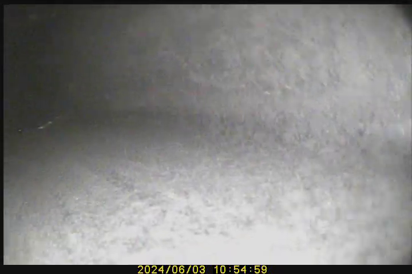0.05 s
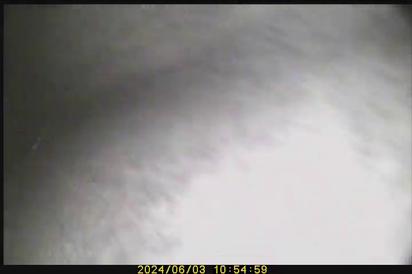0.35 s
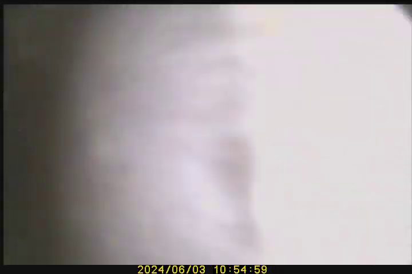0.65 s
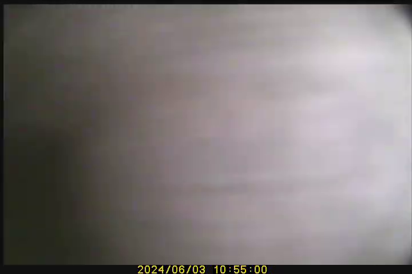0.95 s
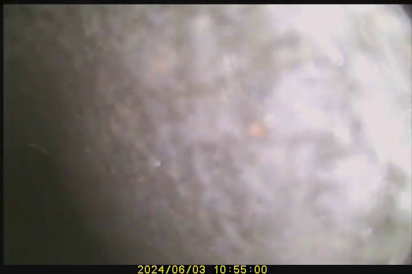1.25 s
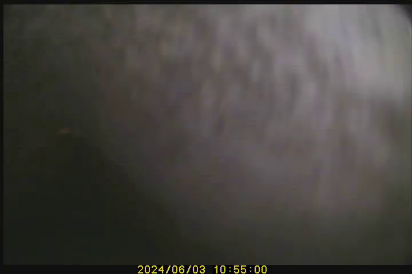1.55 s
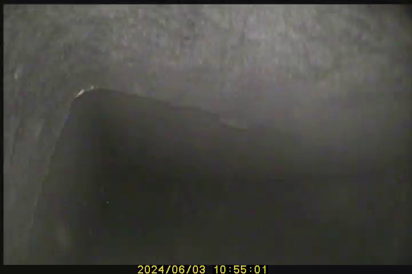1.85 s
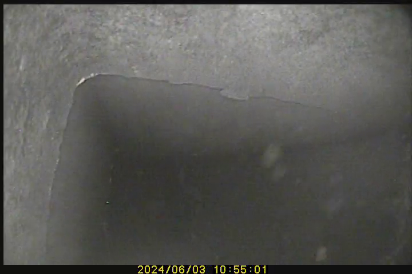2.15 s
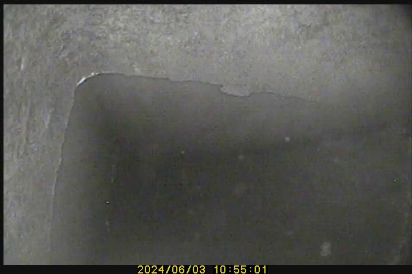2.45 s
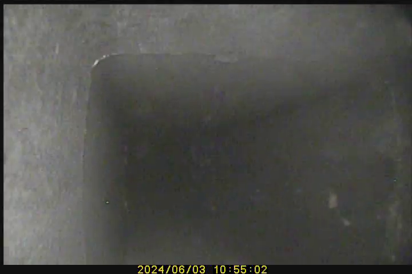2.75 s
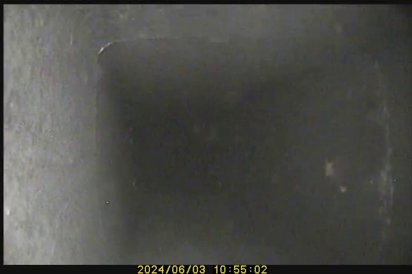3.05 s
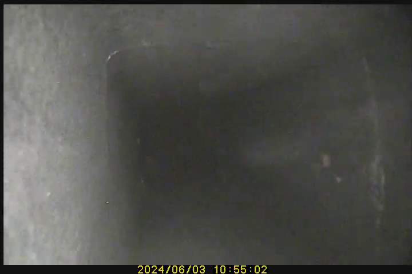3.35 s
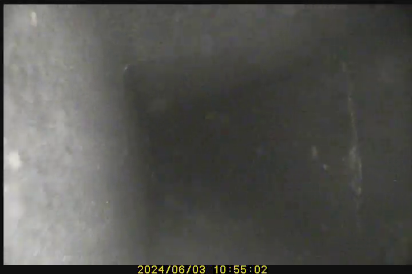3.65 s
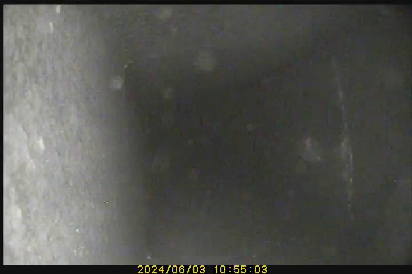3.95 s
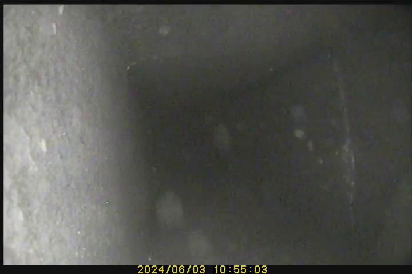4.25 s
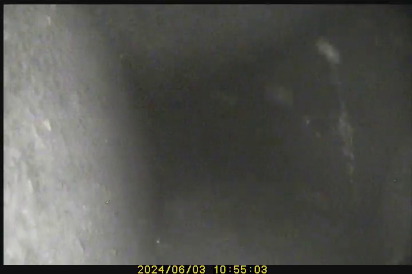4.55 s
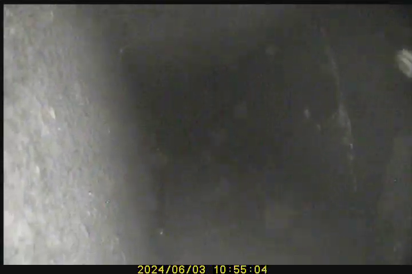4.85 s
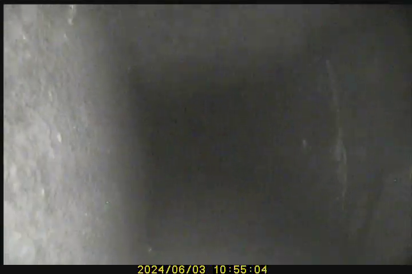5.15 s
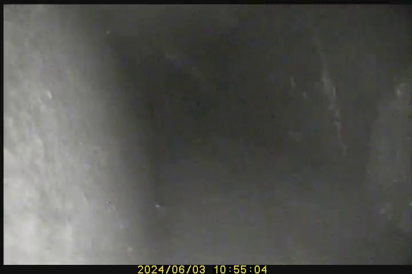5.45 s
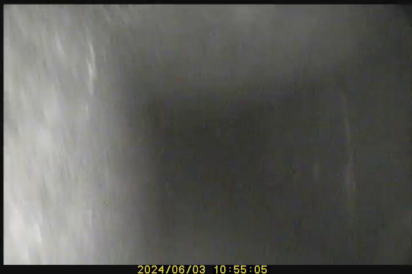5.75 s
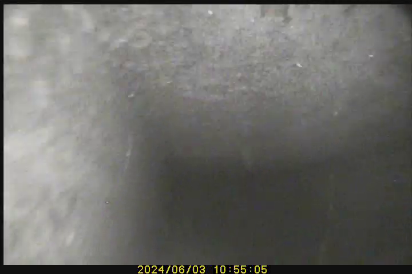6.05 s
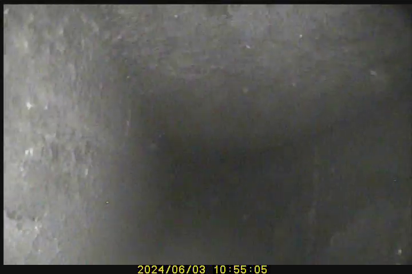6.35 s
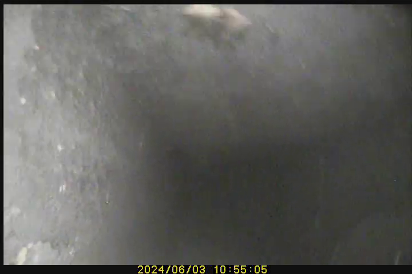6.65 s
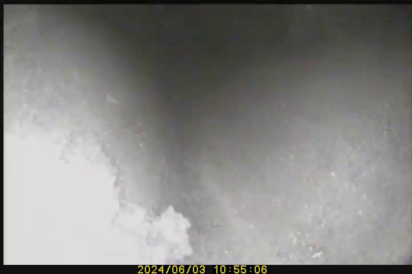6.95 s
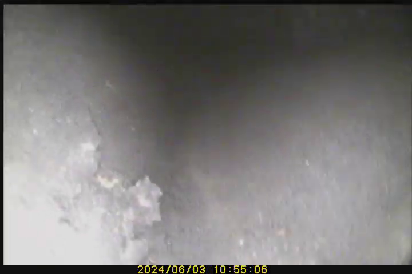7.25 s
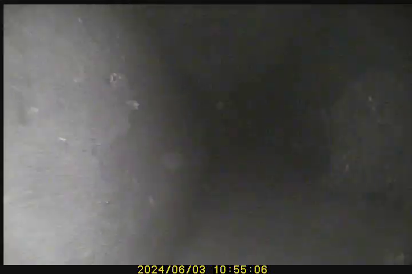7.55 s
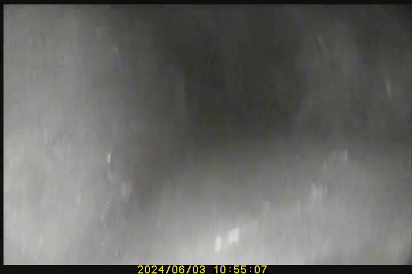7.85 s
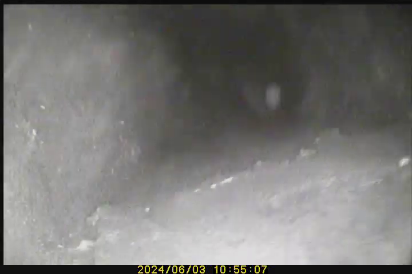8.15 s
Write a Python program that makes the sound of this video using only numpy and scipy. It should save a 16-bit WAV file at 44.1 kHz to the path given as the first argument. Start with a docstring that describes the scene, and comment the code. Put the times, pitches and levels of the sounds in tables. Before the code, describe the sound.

An inspection camera pushed along a chimney flue scrapes and hisses in uneven surges, with sharp knocks and brief metallic ringing.

```python
"""A faint hum and a sliding hiss come first: indoors, an inspection camera is pushed along a chimney flue. Its
rod hisses with each push, while its head grinds over soot, knocks on the walls and chafes on ridges. Hard rubs
stir a hollow note in the flue, and later the metal head rings as it drags along an edge and takes a blow. The
recorder cuts off the highest treble and clips the hardest knocks."""
import sys
import numpy as np
from scipy import signal
from scipy.fft import rfft, irfft, next_fast_len
from scipy.io import wavfile
from scipy.ndimage import uniform_filter1d, map_coordinates

SR = 44100
rng = np.random.default_rng(int(sys.argv[2]) if len(sys.argv) > 2 else 0)


def inscribe(sig):
    """Save sig as 16-bit PCM at rate SR to the path in sys.argv[1].

    A 1-D sig is mono; a 2-D sig holds one channel per row.
    Samples are clipped to [-1, 1] before scaling.
    """
    pcm = np.round(np.clip(np.atleast_2d(sig).T, -1, 1) * 32767)
    wavfile.write(sys.argv[1], SR, pcm.astype(np.int16))


N = 370440  # 8.4 seconds


def amp(db):
    """Turn decibels into a number to multiply by (a gain)."""
    return 10 ** (np.asarray(db) / 20)

def unit(x):
    """Scale a sound to an average strength (rms) of 1."""
    return x / np.sqrt(np.mean(x ** 2) + 1e-20)

def along(points, hz):
    """Read between (frequency, value) points, giving each octave equal room."""
    freqs, values = np.transpose(points)
    return np.interp(np.log(hz + 1), np.log(freqs + 1), values)

def wobble(rate):
    """A smooth curve through `rate` random values a second."""
    return map_coordinates(rng.standard_normal(int(N * rate / SR) + 4), [np.arange(N) * rate / SR])

def swell(time, rise, hold, fall, fade_db=21.5):
    """A gain that reaches 1 at `time`, holds, then dies away; rise and fall each cover fade_db."""
    t = np.arange(N) / SR - time
    before = np.maximum(-t, 0) / max(rise, .005)
    after = np.maximum(t - hold, 0) / max(fall, .005)
    return amp(-fade_db * (before + after))

def coloured(x, gain):
    """Filter a sound so that each frequency is scaled by gain(hz)."""
    half = next_fast_len(len(x) // 2 + 2048)
    hz = np.fft.rfftfreq(2 * half, 1 / SR)
    cepstrum = irfft(np.log(np.maximum(gain(hz), 1e-6)))
    # folding this makes the filter ring after a sound, never before it
    cepstrum[1:half] *= 2
    cepstrum[half + 1:] = 0
    return irfft(rfft(x, 2 * half) * np.exp(rfft(cepstrum)))[:len(x)]

def note_gain(hz, centre, width):
    """A resonance: it passes frequencies near its centre and drops steeply on both sides."""
    return 1 / (1 + ((hz * hz - centre * centre) / ((hz + 1) * width)) ** 2)

# resonances of the flue and rod (pitch [Hz], width [Hz], boost [dB])
RESONANCES = [(659, 17, 6), (750, 32, 2.5), (900, 57, 1), (1143, 90, 4), (1270, 20, 3), (1544, 47, 5),
              (1840, 100, 1.5), (2360, 49, 2), (2990, 68, 3.5), (3620, 64, -1.5), (3700, 52, 1),
              (4500, 60, -2)]
def in_flue(tone, hz):
    """The gain of a tone colour once the flue and rod add their peaks and dips."""
    boost = sum(db / (1 + (2 * (hz - centre) / width) ** 2) for centre, width, db in RESONANCES)
    return amp(along(tone, hz) + boost)

# tones of the equipment (pitch [Hz], level [dB])
HUM_TONES = [(263.8, -71.5), (300, -72.5), (430, -67.5), (545, -67.5), (662, -67.5), (5862, -61.5)]
# tone colour of the room's air (frequency [Hz], relative level [dB])
AIR_TONE = [(25, -18), (80, 10), (160, -14), (400, 3.5), (700, 5.5), (2000, 3), (5000, -19.5), (8000, -6.5)]
def hum_and_air():
    """The equipment hums and thinly whines over the soft noise of still room air."""
    t = np.arange(N) / SR
    hum = sum(amp(db) * np.sqrt(2) * np.sin(2 * np.pi * hz * t + 0.26 * wobble(6.6))
              for hz, db in HUM_TONES)
    air = unit(coloured(rng.standard_normal(N), lambda hz: in_flue(AIR_TONE, hz)))
    return hum + amp(-50.5) * air

# pushes of the rod (time [s], rise [s], hold [s], fall [s], level [dB], grit [0 smooth to 1 coarse])
PUSHES = [(0.058,0.13,0.095,0.11,-38.5,0.071), (0.205,.03,0.017,0.088,-36,0.85),
          (0.314,0.12,0.37,0.083,-38,0.84), (0.803,0.38,0.22,0.068,-32,0.62),
          (1.527,0.15,0.029,0.56,-36.5,0), (2.122,0.22,0.065,0.072,-41,0.17), (2.51,0.33,0.039,0.038,-41,0),
          (2.6,0.08,0.22,0.15,-46,0.73), (3.06,.12,0.23,0.21,-48.5,0.1), (3.421,0.52,.24,0.39,-37,0.16),
          (3.993,0.81,0.13,.4,-47.5,0), (4.417,0.25,0.074,1,-37.5,0.64),
          (4.808,0.096,0.019,0.13,-41.5,0.11), (5.017,0.12,0.019,0.037,-41.5,0.23),
          (5.178,0.033,.03,0.29,-37,0.091), (5.37,0.17,0.097,0.14,-42,0.42), (5.68,0.36,0.14,.1,-47.5,0.79),
          (5.852,0.14,0.018,0.19,-33,0.34), (5.929,0.081,0.099,0.18,-30.5,0.81),
          (6.188,0.21,0.032,0.12,-32,.55), (6.41,0.29,0.15,0.16,-45,0.32), (6.656,0.035,.02,0.2,-34,0.41),
          (6.794,0.18,0.2,0.24,-35,0.82), (7.164,0.064,0.024,0.59,-38,0.32),
          (7.475,.04,0.031,0.076,-35,0.5), (7.6,0.11,0.022,0.55,-39.5,0.53), (7.79,0.37,0.19,0.43,-45,0.36),
          (8.135,0.23,0.051,0.5,-43.5,0.22)]
def rod_pushes(creep_db=-55, creep_grit=0.49):
    """Levels in dB of grind, rasp and hiss: all follow the push, and grit trades hiss for grind."""
    moves = [(amp(db) * swell(time, rise, hold, fall), grit) for time, rise, hold, fall, db, grit in PUSHES]
    moves.append((amp(creep_db), creep_grit))  # between pushes the rod still creeps along
    power = np.zeros((3, N))
    for gain, grit in moves:
        grind_db = np.interp(grit, (0, 1), (-12, 2.5))
        hiss_db = np.interp(grit, (0, 1), (11, -4))
        power += amp([grind_db, 0, hiss_db])[:, None] ** 2 * gain ** 2
    return 10 * np.log10(power)

def friction(tone, rate, spread_db, smooth=1.0):
    """Rubbing is many tiny uneven slips, `rate` a second, mixed with smooth noise."""
    slips = (rng.random(N) < rate / SR) * rng.standard_normal(N)
    slips *= amp(spread_db * np.clip(rng.standard_normal(N), -2, 2))
    force = unit(slips) + smooth * rng.standard_normal(N)
    return unit(coloured(force, lambda hz: in_flue(tone, hz)))

# tone colours of the low, middle and high parts of a scrape (frequency [Hz], relative level [dB])
GRIND_TONE = [(30, -35), (130, -31), (210, -10), (340, -13.5), (480, -5.5), (700, 1), (1150, 0), (1600, -3),
              (2600, -15.5), (6000, -48.5)]
RASP_TONE = [(150, -33), (700, -14.5), (1300, -6.5), (1800, 2), (2700, 1), (3400, 0), (4600, -4),
             (8000, -21)]
HISS_TONE = [(30, -14.5), (110, -16.5), (300, -15), (900, -18.5), (2200, -10.5), (3500, -3.5), (4600, -5),
             (6000, -6), (7400, -9.5), (8500, -2.5)]
def scraping(grind_db, rasp_db, hiss_db):
    """The head judders over coarse soot while the rod slides smoothly behind it."""
    # the harder the head presses, the more it catches and lets go
    judder = wobble(55) * np.clip((grind_db + 60.5) / 20, 0, 1)
    grind = amp(grind_db + 2 * judder + 0.7 * wobble(22))
    grind *= friction(GRIND_TONE, rate=900, spread_db=0.5, smooth=0.68)
    rasp = amp(rasp_db + 2.9 * judder + .5 * wobble(14))
    rasp *= friction(RASP_TONE, rate=2500, spread_db=2)
    hiss = amp(hiss_db + 0.84 * judder + 1.5 * wobble(25))
    hiss *= friction(HISS_TONE, rate=4000, spread_db=0.5)
    return grind + rasp + hiss

def soot_crumbs(grind_db, per_second=40, typical_hz=1103):
    """Lumps of soot catch under the head: small dull taps that follow the level of the grinding."""
    out = np.zeros(N + SR)
    t = np.arange(SR // 20) / SR
    gaps = rng.exponential(size=900)
    chance = np.clip(rng.standard_normal((len(gaps), 2)), -2, 2)
    starts = (np.cumsum(gaps) / per_second * SR).astype(int)
    for start, (pitch, size) in zip(starts[starts < N], chance):
        hz = typical_hz * np.exp(0.442 * pitch)
        fade = amp(-20 * hz * t / 9) * (1 - np.exp(-hz * t))  # drops 20 dB every 9 cycles
        tap = fade * np.sin(2 * np.pi * hz * t)
        out[start:start + len(t)] += amp(grind_db[start] + 3 + 3 * size) * tap
    return out[:N]

def ring_width(ring_hz, rod_hz=2090):
    """Width in Hz of a knock's ring: broader when high, but purer near the rod's own note."""
    near_rod = np.exp(-(np.log(ring_hz / rod_hz) / 0.16) ** 2)
    return 1400 * np.sqrt(ring_hz / rod_hz) * (1 - 0.6 * near_rod)

# blows on the wall (time [s], relative level [dB], ring pitch [Hz], thud boost [dB],
# crack boost [dB], time for the rattle to fade by 60 dB [s])
WALL_KNOCKS = [(0.166,-0.5,2610,-26,-27,0.037), (.169,-2,1740,-22.5,-31,0.082),
               (.296,-16.5,1030,-17,-20,0.13), (.927,-3,1790,-31,-15.5,0.13),
               (1.018,-17.5,1630,-36,3.5,0.058), (1.123,-26,1610,-34,-13,0.08),
               (1.159,-31,1710,-31,-11,0.14), (1.767,-21,1460,-12.5,-18,0.17),
               (1.93,-27,3400,-47,-7.5,0.16), (2.588,-27.5,4140,-40,-6.5,.11),
               (4.3638,-7.5,1870,-35,-17,0.056), (4.458,-1,2060,-21,-5.5,0.031),
               (4.545,-13.5,2100,-32,-11,0.019), (4.866,-12.5,3930,-25,-6,0.083),
               (5.025,-18,4130,-18,-7,0.025), (5.195,-17.5,3050,-24,-1.5,.14), (5.203,3,3170,-15,-4,0.035),
               (5.215,-1,3890,-28,-7.5,.065), (5.304,-10.5,1480,-38,-28,0.058),
               (5.382,-25,3400,-13,-2,0.15), (5.409,-11.5,1680,-24,-19,0.067), (5.799,-1,1920,-7,-3,0.045),
               (5.806,-10.5,780,-9.5,-2,0.15), (6.2008,-7.5,1510,-13.5,-29,0.069),
               (6.226,-6,940,-36,-26,0.023), (6.289,-20,960,-22,-20,.05), (6.406,-22.5,2340,-33,-9,0.12),
               (6.445,-9.5,2260,-39,-21,0.065), (6.62,-6.5,1970,-15.5,-6,.084),
               (6.714,-22.5,550,-8.5,-20,0.2), (6.783,-10.5,1800,-19,-3.5,.1),
               (6.929,-13.5,1000,-6.5,-8.5,0.22), (7.0866,-5,3430,-18,-11,0.14),
               (7.094,-10.5,3940,-20,-12,0.17), (7.124,-11,3800,-22,-5,0.2), (7.234,-18,1020,-25,-23,0.073),
               (7.535,-19.5,1730,-37,-10,.05), (7.573,-20,1560,-42,-12,0.046),
               (7.598,-17,2880,-32,-21,0.06), (7.868,-22.5,2070,-18,-9,0.078),
               (8.026,-27,4200,-41,-1.5,.068)]
def knocks(rise_s=0.00075, impact_s=0.013, bounce_s=.0062):
    """The head hits the wall and rattles briefly: a short ring, a thud and a bright crack."""
    out = np.zeros(N + SR)
    t = np.arange(SR // 4) / SR
    for time, db, ring_hz, thud_db, crack_db, rattle_s in WALL_KNOCKS:
        impact = amp(-60 * t / impact_s)
        rattle = 0.7 * amp(-60 * t / rattle_s)
        strike = (impact + rattle) * (1 - np.exp(-t / rise_s))
        # the head bounces twice, loudly only after a hard blow
        bounce = min(0.42 * amp(db) ** 2, 1)
        hits = [bounce ** k * np.interp(t - k * bounce_s, t, strike) for k in range(3)]
        fade = np.sqrt(sum(hit ** 2 for hit in hits))
        parts = [(-8.5, lambda hz: note_gain(hz, ring_hz, ring_width(ring_hz))),
                 (thud_db, lambda hz: in_flue(THUD_TONE, hz)),
                 (crack_db, lambda hz: in_flue(CRACK_TONE, hz))]
        for part_db, gain in parts:
            burst = coloured(fade * rng.standard_normal(len(t)), gain)
            burst *= np.linalg.norm(fade) / np.linalg.norm(burst)
            out[round(time * SR):][:len(t)] += amp(db + part_db + 0.5) * burst
    return out[:N]

# rubs on ridges (middle time [s], half length [s], level [dB], pitch [Hz])
RIDGE_RUBS = [(.337,0.031,-23.5,2000), (0.384,0.032,-28,1700), (0.487,0.03,-25.5,1480),
              (.568,0.019,-32,890), (0.644,0.019,-31.5,1000), (2.478,.14,-46,2900), (2.54,0.021,-35.5,4500),
              (2.731,0.31,-45,1650), (3.238,0.21,-42,2370), (3.55,0.19,-48,1190), (3.641,0.063,-37,1810),
              (4.003,.25,-45.5,3220), (4.181,0.18,-43,2850), (4.331,0.067,-44,520), (4.415,0.09,-50,490),
              (4.51,0.17,-33,2070), (4.678,0.066,-32.5,2480), (5.953,0.028,-19.5,1350),
              (6.017,0.031,-26,1300), (6.141,0.016,-28,1900), (6.804,.032,-24,1000),
              (6.863,0.014,-28.5,5000), (6.912,0.03,-26.5,3140), (7.01,.022,-34.5,5500),
              (7.135,0.032,-22.5,3900), (7.424,.1,-43,1440), (7.484,.03,-34.5,2630), (7.512,0.028,-33,1170),
              (7.758,.25,-42,2830), (7.897,0.034,-33,2400)]
def chafing():
    """The head chafes on a ridge, and the contact sounds a broad, gritty note."""
    out = np.zeros(N + SR)
    for middle, half_length, db, pitch in RIDGE_RUBS:
        width_hz = 0.882 * pitch * (.03 / half_length) ** 0.56  # longer rubs settle into a purer note
        n = round(2 * half_length * SR)
        grit = rng.standard_normal(n) * amp(2 * rng.standard_normal(n))
        rub = unit(coloured(grit, lambda hz: note_gain(hz, pitch, width_hz)))
        out[round((middle - half_length) * SR):][:n] += amp(db) * np.hanning(n) ** 2 * rub
    return out[:N]

# hard rubs (time [s], rise [s], hold [s], fall [s], level [dB])
HARD_RUBS = [(0.937,0.038,.018,0.11,-21.5), (1.131,.012,0.015,0.051,-34)]
def hollow_note(pitch_hz=683, width_hz=90):
    """Hard rubbing makes the air in the flue sound one hollow note."""
    note = coloured(rng.standard_normal(N), lambda hz: 1 / (1 + (2 * (hz - pitch_hz) / width_hz) ** 2))
    # even out the note's strength, so that it stays rough but follows the rub
    strength = np.sqrt(np.abs(uniform_filter1d(note ** 2, size=1200)) + 1e-12)
    rubs = sum(amp(db) * swell(time, rise, hold, fall) for time, rise, hold, fall, db in HARD_RUBS)
    return rubs * note / strength

# tones of the metal head (pitch [Hz], level [dB], fall [s])
METAL_TONES = [(1024,-50,.25), (1240,-38,.06), (1312,-50,0.18), (1490,-43,.06), (1700,-42,0.29),
               (2070,-42,.07), (2180,-47,0.2), (2440,-44.5,0.27), (2950,-47.5,.07), (3300,-45,.07),
               (3502,-36,0.064), (3645,-46,.07), (4018,-35,.1), (4400,-40.5,0.063), (4788,-45,.06),
               (5100,-53,0.15), (5200,-41.5,0.065)]
# swells of the metal ring: drags along an edge, and near 6.18 s a blow on the wall (time [s], rise [s], hold
# [s], boost [dB], extra boost for low tones [dB])
METAL_SWELLS = [(5.98,0.051,.08,-10,4), (6.13,.12,0.13,-1,0), (6.18,.03,0.031,-1,9), (6.23,0.044,0.018,4,2),
                (8.126,0.023,0.014,-2.5,-20)]
def metal_ring(flutter_db=3, low_below_hz=3300):
    """Dragged along an edge, or jolted by a blow, the metal head sings in many tones, each fluttering on its
    own."""
    t = np.arange(N) / SR
    ring = np.zeros(N)
    for hz, db, fall in METAL_TONES:
        # each swell sets how strongly the low tones ring beside the high ones
        drags = [amp(boost_db + (hz < low_below_hz) * low_db) * swell(time, rise, hold, fall)
                 for time, rise, hold, boost_db, low_db in METAL_SWELLS]
        strength = np.max(drags, axis=0) * amp(db + flutter_db * wobble(35))
        ring += strength * np.sin(2 * np.pi * hz * t + 0.78 * wobble(40))
    return ring

# how long the echo lasts (frequency [Hz], time to fade by 60 dB [s])
ECHO_TIMES = [(150, 0.58), (700, 0.18), (2500, 0.23), (8000, 0.17)]
def echo(x, delay_samples=300):
    """Reflections blur into a tail in which each frequency dies at its own speed."""
    hz, t, noise = signal.stft(rng.standard_normal(SR // 2), SR, nperseg=256)
    fade = amp(-60 * t / along(ECHO_TIMES, hz)[:, None])
    tail = signal.istft(noise * fade, SR, nperseg=256)[1]
    return signal.fftconvolve(np.pad(x, (delay_samples, 0)), tail / np.linalg.norm(tail))[:N]

# tone colours of a knock's thud and crack (frequency [Hz], relative level [dB])
THUD_TONE = [(30,-5), (90,-11), (135,-9.5), (200,-1), (300,-1), (500,-1), (950,6.5), (1600,-9.5),
             (3000,-14), (8000,-46.5)]
CRACK_TONE = [(100, -32.5), (600, -16.5), (1100, -11), (1800, 0.5), (3000, -1), (4200, 0), (6000, -5.5),
              (8000, -9)]
def scene():
    """Scrapes and knocks with their echo, plus the hollow note, ringing metal and hum, in mono."""
    grind_db, rasp_db, hiss_db = rod_pushes()
    scrape = scraping(grind_db, rasp_db, hiss_db) + chafing() + soot_crumbs(grind_db)
    blows = knocks()
    echoes = echo(amp(-10.5) * scrape + amp(-18.5) * blows)
    return (scrape + blows + echoes + hollow_note() + metal_ring() + hum_and_air())[None]

def record(dry, treble_edge_hz=7900, top_hz=15870, offset=.134):
    """The recorder cuts the top treble; its steady offset makes loud peaks overload on one side first."""
    hz = np.fft.rfftfreq(N + SR, 1 / SR)
    shifted = dry + offset
    squashed = shifted / (1 + np.abs(shifted / .76) ** 6) ** (1 / 6) - offset
    spectrum = rfft(squashed, N + SR) / np.hypot(1, (hz / treble_edge_hz) ** 36)
    clipped = np.clip(irfft(spectrum, N + SR) + offset, -.73, .73)
    return irfft(rfft(clipped) * (hz < top_hz), N + SR)[:, :N]

dry = scene()
out = record(dry)
inscribe(out)
```